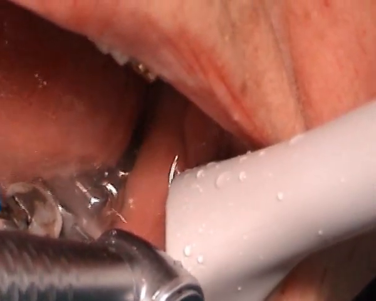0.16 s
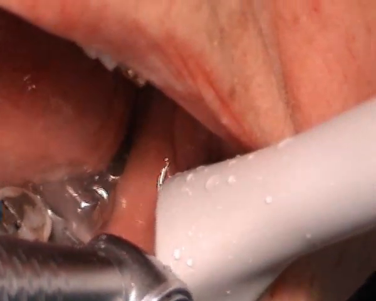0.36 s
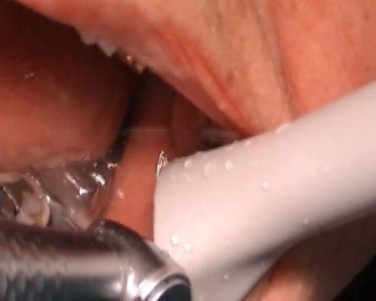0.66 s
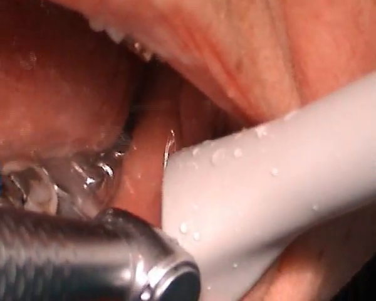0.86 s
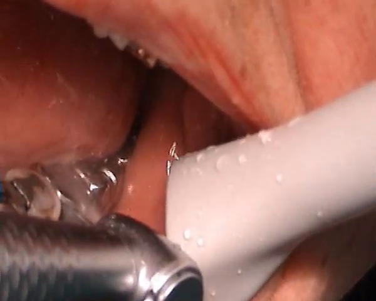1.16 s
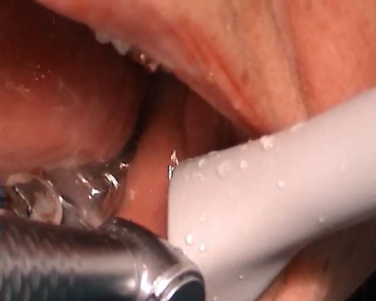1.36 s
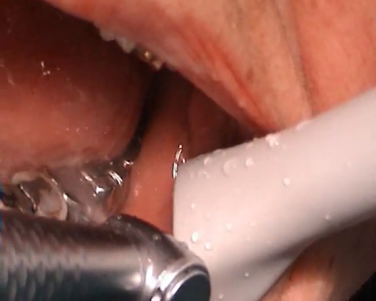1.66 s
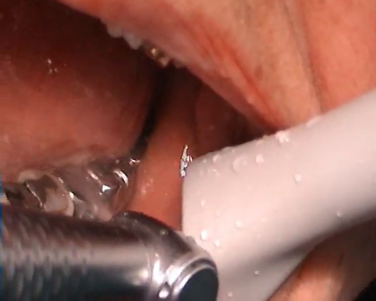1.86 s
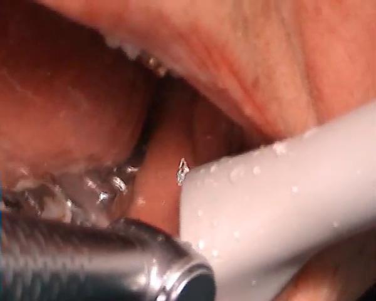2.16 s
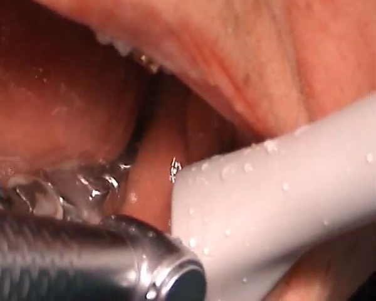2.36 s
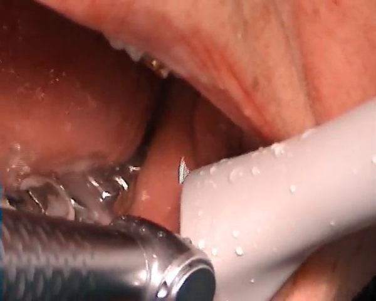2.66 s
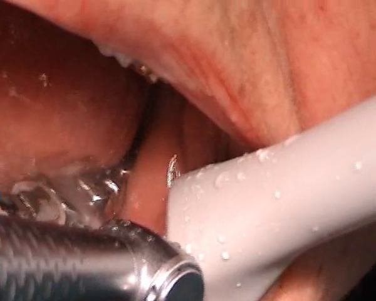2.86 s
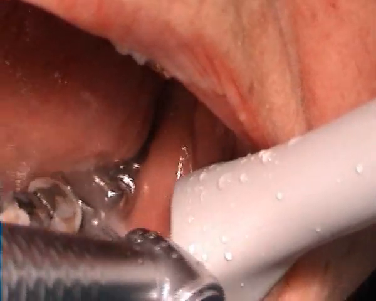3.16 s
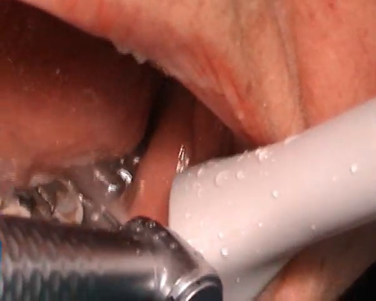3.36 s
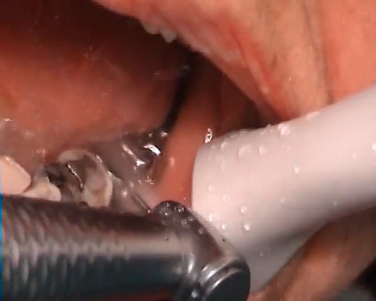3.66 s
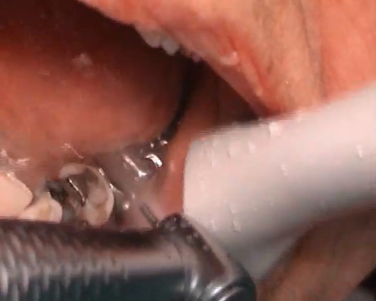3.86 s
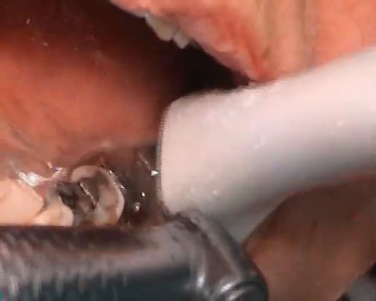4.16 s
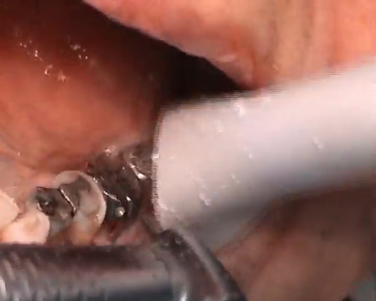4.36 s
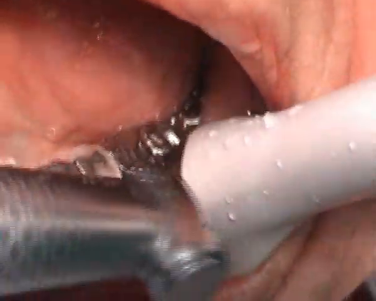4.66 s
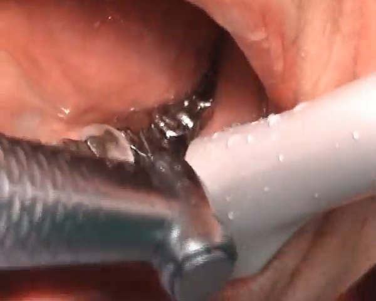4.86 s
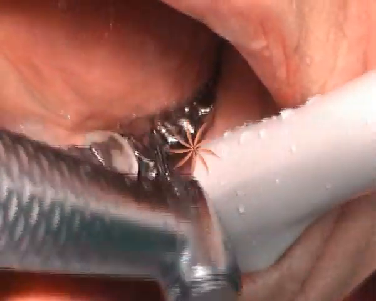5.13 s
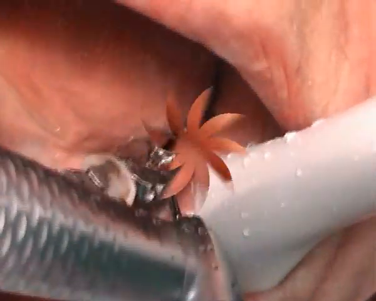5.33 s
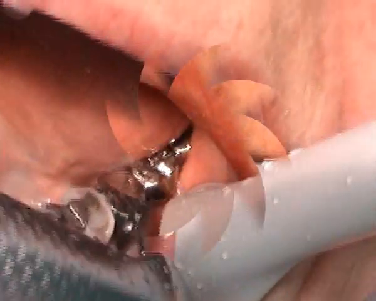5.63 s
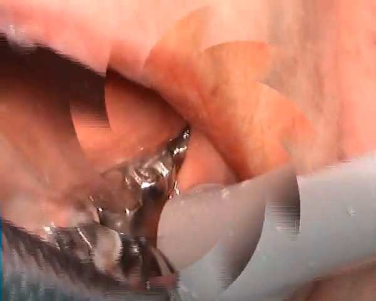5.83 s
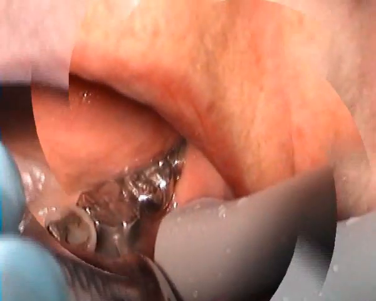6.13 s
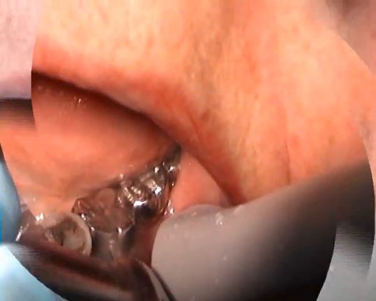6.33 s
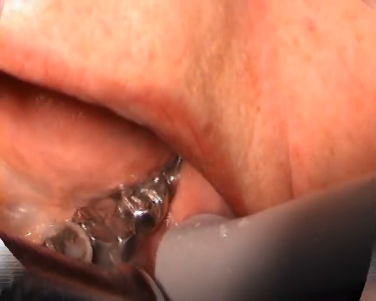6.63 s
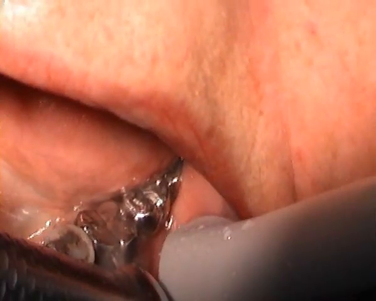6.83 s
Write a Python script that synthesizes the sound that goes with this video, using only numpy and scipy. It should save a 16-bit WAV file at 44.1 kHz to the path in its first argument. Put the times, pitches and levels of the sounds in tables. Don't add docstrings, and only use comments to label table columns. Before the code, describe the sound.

A dental drill whines shrilly through hissing water spray and suction, speeds up, rattles down to a stop, then fades into another pass.

```python
import sys
import numpy as np
from scipy import signal
from scipy.fft import rfft, irfft, next_fast_len
from scipy.io import wavfile

SR = 44100
rng = np.random.default_rng(int(sys.argv[2]) if len(sys.argv) > 2 else 0)


def magnitude_from_level(level_db):
    exponent = np.asarray(level_db, float) / 20
    return 10 ** exponent


def inscribe(sig):
    pcm = np.round(np.clip(np.atleast_2d(sig).T, -1, 1) * 32767)
    wavfile.write(sys.argv[1], SR, pcm.astype(np.int16))


N = 308259
TIME_S = np.arange(N) / SR
SIZE = next_fast_len(N, real=True)
HZ = np.maximum(np.fft.rfftfreq(SIZE, 1 / SR), 1)
LOG_HZ = np.log(HZ)

LIFT_OFF_S, AIR_SHUT_S = 3.09, 4.248
FADE_OUT_S, FADE_OUT_DB_PER_S = 5.033, 13
FADE_IN_S, FADE_IN_LENGTH_S = 5.773, 1.27

# frequency in Hz, level in dB per Hz.
ROOM_COLOUR = [(25, -22), (50, -20), (100, -22), (200, -14), (350, -11.5), (480, -11.5), (700, -14.5)]
ROOM_DB = -46.5
# centre in seconds, half length in seconds, frequency in Hz, level in dB, change at the edges in dB.
HUM = (5.55, .7, 66.6, -56.5, -16)

# centre in seconds, half length in seconds, frequency in Hz, width in Hz, level in dB.
RIM_WHISTLE = (4.5, 0.2, 3640, 45, -30)
# start in seconds, share lifted out of the water 0-1, air flow in dB.
TIP = [
    (0, 0.02, -20),
    (.18, 0.02, -24),
    (2.95, .02, -24),
    (3.2, .15, -21),
    (4.0, 0.58, -19),
    (4.2, 0.45, -22),
    (4.27, 0.92, -18.5),
    (4.45, 0.93, -18),
    (5.0, 0.82, -17),
]
UPPER_RESONANCES_DB = (0.38, -3, 2.3)
# frequency in Hz, level in dB per Hz.
TIP_WET = [(700, -11), (1100, -5.5), (1350, 2), (1540, 11), (1800, 1), (2000, -6), (2250, -9), (2600, 2),
           (2900, 8.5), (3400, 5), (3850, -8.5), (4200, 2.5), (4500, -3.5), (5200, 2.5)]
# frequency in Hz, level in dB per Hz.
TIP_OPEN = [(800, -1.5), (1150, 5), (1480, 19.5), (1750, 9.5), (2180, -4), (2700, 1.5), (3300, 10.5),
            (3800, 3), (4800, 2.5), (5800, 6.5), (7300, 6.5), (9000, 2.5), (11000, -4), (13700, -12.5)]
# frequency in Hz, level in dB per Hz.
TIP_OPEN_RUMBLE = [(25, -19), (50, -19), (100, -13.5), (200, -7.5), (350, -6), (500, -8.5), (800, -3)]
# frequency in Hz, level in dB per Hz.
TIP_SECOND = [(700, -12), (1050, -5), (1450, 8), (1750, 1), (2100, -17.5), (2600, -6), (3070, 4),
              (3400, -5), (3700, -4), (4100, -4), (4600, -3), (5200, -2)]
# centre in seconds, half length in seconds, upper resonances in dB.
CHOKES = [
    (4.3, 0.14, -4),
    (5.4, 0.096, 1.5),
]
# centre in seconds, half length in seconds, body in dB, top in dB.
TIP_HISS = [
    (4.25, 0.037, -11, -6),
    (4.5, 0.09, -4, -4),
    (4.95, .1, 1.5, -0.5),
]
RUMBLE_DB = -19.5
SECOND_DRAW_DB, SECOND_LIFTED = -22.5, 0.18
TIP_HISS_BODY_DB, TIP_HISS_TOP_DB = -20, -23.5
TIP_DULLING, TOP_LEAD_S = 1.27, 0.18

# body in dB, top in dB.
SPRAY_DB = [
    (-17, -19.5),
    (-17.5, -22),
    (-18.5, -19.5),
]
# frequency in Hz, level in dB per Hz.
SPRAY_COLOURS = [
    [(5200, -2), (6200, -1.5), (6900, 5), (7450, 8.5), (7900, 11.5), (8400, 11), (9000, 10), (9700, 5),
     (10400, 8), (10900, 12), (11400, 7.5), (12000, 1.5), (12800, 4), (13700, -6)],
    [(5200, 1.8), (6200, 4.5), (6900, 5.5), (7450, 6), (7900, 7.5), (8400, 11), (9000, 10), (9700, 6),
     (10400, 3), (10900, 5), (11400, 2), (12200, 3.5), (12800, -1.5), (13700, -5)],
    [(5200, -1.5), (5900, -5), (6900, -1.5), (7200, -0.5), (7450, 5.5), (7750, -1), (8300, 2), (9500, -6.5),
     (10200, -5), (10700, -1.5), (11300, -6), (12000, -1), (12800, -9), (13700, -5.5)],
]
# centre in seconds, half length in seconds, body in dB, top in dB.
SURGES = [
    (.05, 0.13, 2.3, -.3),
    (.3, .06, -0.5, -2),
    (1.2, .2, 0.3, 1.2),
    (2.0, .1, -0.4, -1),
    (2.7, .06, 0.7, 0.5),
    (3.75, 0.09, 1.5, 2.8),
    (4.14, .015, 1.6, 2),
    (4.22, 0.018, 0, 6),
]
# frequency in Hz, width in Hz, level over the hiss in dB.
WHISTLES = [
    (11850, 90, 5),
    (7360, 60, 5.5),
    (12100, 200, 4),
]
SPRAY_SPLIT_HZ = 9900
AIR_FALL_DB_PER_S, SPRAY_BUILDS = 350, 1.13

# time in seconds, bur rate in Hz.
FIRST_PASS = [(0.0, 3023), (0.11, 2982), (0.22, 2919), (0.44, 2861), (0.77, 2829), (1.1, 2812),
              (1.21, 2841), (1.43, 2811), (1.65, 2796), (1.87, 2744), (2.2, 2734), (2.53, 2805),
              (2.64, 2795), (2.86, 2738), (2.98, 2744)]
# time in seconds, bur rate in Hz.
RUN_UP = [
    (3.03, 2797),
    (3.08, 2906),
    (3.13, 3030),
    (3.2, 3120),
    (3.3, 3163),
    (3.45, 3183),
    (3.65, 3194),
    (3.91, 3196),
]
# time in seconds, bur rate in Hz.
SECOND_PASS = [
    (5.8, 3147),
    (6.3, 3151),
    (6.62, 3152),
    (6.68, 3132),
    (6.74, 3081),
    (6.8, 3019),
    (6.86, 2988),
    (6.99, 2944),
]
# free bur rate in Hz, drop at full load in Hz.
LOADING = [
    (3190, 250),
    (3150, 30),
]
# 2nd, 3rd, gear mesh, 4th order, motor, each as free level in dB, cutting level in dB.
ORDER_DB = [
    [(-41, -36), (-24, -26), (-60, -24), (-43, -26), (-44, -55)],
    [(-52, -26), (-45, -28), (-60, -50), (-53, -27), (-47, -53)],
]
MESH_ORDER, MOTOR_ORDER = 3.177, 0.2
# centre in seconds, half length in seconds, column of ORDER_DB, change in dB.
BITES = [(.15, .09, 0, 8), (.7, .22, 0, -11), (1.3, .2, 0, 5), (1.66, .08, 0, 7), (2.45, .13, 0, 4),
         (2.82, .04, 0, -3), (2.98, .05, 0, 4.5), (3.18, .06, 0, -16), (.11, .05, 1, -8), (.38, .16, 1, 8),
         (1.37, .1, 1, 8), (1.63, .07, 1, -6), (2.2, .06, 1, 6), (2.53, .15, 1, 8), (2.92, .07, 1, -6),
         (6.72, .04, 3, -4), (6.8, .05, 1, 5), (.08, .08, 3, -5), (.8, .22, 3, -11), (1.93, .1, 3, 4),
         (2.2, .05, 3, 6), (2.95, .1, 3, -4), (3.17, .05, 3, -16), (3.45, .07, 3, 6), (.08, .1, 4, 5),
         (.77, .04, 4, 6), (1.0, .06, 4, 7), (1.65, .05, 4, 6)]
# time in seconds, bur rate in Hz, rattle in dB.
COAST = [
    (3.91, 3195, -33),
    (4.09, 2600, -37),
    (4.13, 2425, -30),
    (4.19, 2090, -25),
    (4.22, 1914, -23),
    (4.25, 1780, -24),
    (4.3, 1598, -36),
    (4.5, 1080, -33),
    (4.84, 400, -37),
]
# order, level with air on in dB, level after the air shuts in dB.
COAST_ORDERS = [(1, 2, 6), (3, 7, -3), (4, 2, -3), (5, 0, 2), (6, 5, -10), (7, -1, -12), (8, -6, 4),
                (16, -9, 6)]
# frequency in Hz, level in dB.
HEAD_RING = [(900, -30), (1300, -9), (1900, -4), (2200, -11), (3100, 3), (5400, -13), (6200, -20),
             (7300, -4), (8500, 1), (10000, -1), (12000, 3), (13000, 1), (13900, -9)]

# frequency in Hz, left lead in radians, left-right in dB, likeness 0-1.
PORTS = [(600, 0.18, 7, 0.92), (2500, 0.74, -3, 0.96), (4070, .1, -3, 1), (5660, 1.1, 4, 1),
         (6150, 0.35, 2, 0.62), (7730, 0.62, 3.5, 0.76), (8250, 1.9, 2, 1), (9120, 2.06, 1.3, 1),
         (9570, 2.7, 2.5, 0.84), (10500, 2.5, 6.5, 0.55), (10860, 2.34, 6.5, 1), (11800, 0.94, 4, 0.55),
         (13800, 1.2, 1.5, .22)]
# frequency in Hz, left lead in radians, left-right in dB, likeness 0-1.
PORTS_TIP = [(60, 0.099, 2.2, 0.89), (300, 0.039, 0, 1), (700, .1, -2, .94), (1370, 0, 0.5, 1),
             (2100, 0.048, -0.5, 1), (3280, 0.29, 0, 0.95), (4800, 0.43, 3.5, 0.9), (7800, 0.34, 2.5, 0.78),
             (9100, 0.75, 3.5, 0.63), (9900, 1, 3.5, 0.16), (11900, .1, 4.5, 0.74), (13700, .1, -2, 0.62)]


def in_time(rows, off=None):
    s, *columns = np.transpose(rows)
    return [np.interp(TIME_S, s, c, left=off, right=off) for c in columns]


def swells(rows):
    s, half_s, *columns = np.transpose(rows)
    coarse_s = TIME_S[::128]
    bells = np.exp(-0.5 * ((coarse_s[:, None] - s) / half_s) ** 2)
    return [np.interp(TIME_S, coarse_s, bells @ c) for c in columns]


def drift(rate_hz):
    knots = rng.standard_normal(282)
    return np.interp(TIME_S * rate_hz, np.arange(len(knots)), knots)


def fading_db(lead_s=0.0):
    return -FADE_OUT_DB_PER_S * np.maximum(TIME_S + lead_s - FADE_OUT_S, 0)


def rising_db():
    return 20 * np.log10(np.clip((TIME_S - FADE_IN_S) / FADE_IN_LENGTH_S, 1e-5, 1))


def at_hz(points, column=1):
    points = np.array(points)
    return np.interp(LOG_HZ, np.log(points[:, 0]), points[:, column])


def above(hz):
    return 1 / (1 + np.minimum(hz / HZ, 9) ** 24)


def closed(points):
    octaves_below = np.maximum(np.log2(points[0][0] / HZ), 0)
    octaves_above = np.maximum(np.log2(HZ / points[-1][0]), 0)
    return magnitude_from_level(at_hz(points) - 17.4 * (octaves_below + octaves_above))


def whistling(colour, hz, width_hz, lift_db):
    return closed(colour) * magnitude_from_level(lift_db / (1 + ((HZ - hz) / width_hz) ** 2))


def at_ports(spectrum, other, ports):
    alike = np.clip(at_hz(ports, column=3), 0, 0.987)
    right = alike * spectrum * np.exp(-1j * at_hz(ports)) + np.sqrt(1 - alike ** 2) * other
    tilt = magnitude_from_level(at_hz(ports, column=2) / 2)
    return irfft(np.array([spectrum * tilt, right / tilt]), SIZE)[:, :N]


def turbulence(gain, ports, low_hz, high_hz):
    real, imaginary = rng.standard_normal((2, 2, len(HZ)), dtype=np.float32)
    one, other = gain * (real + 1j * imaginary)
    inside = (HZ > low_hz) & (HZ < high_hz)
    return at_ports(one, other, ports) * SIZE / (2 * np.sqrt(np.sum(gain[inside] ** 2)))


def hiss(levels_db, colour, ports):
    body_db, top_db = levels_db
    shared_db = 0.5 * drift(9) + 0.86 * drift(30)
    top = above(SPRAY_SPLIT_HZ)
    body = turbulence(colour * np.sqrt(1 - top) * np.sqrt(above(4660)), ports, 6500, 9670)
    sizzle = turbulence(colour * np.sqrt(top), ports, 8400, 17000)
    body_gain = magnitude_from_level(body_db + shared_db + 0.33 * drift(16))
    top_gain = magnitude_from_level(top_db + shared_db + 0.72 * drift(25))
    return body_gain * body + top_gain * sizzle


def whine(turns_hz, orders, wobble):
    out, on = np.zeros(N), turns_hz > 0
    trembling_hz = turns_hz * (1 + wobble * drift(38))
    phase = 2 * np.pi * np.cumsum(trembling_hz[on]) / SR
    for order, level_db in orders:
        audible = order * turns_hz[on] < 13900
        out[on] += np.sqrt(2) * magnitude_from_level(level_db[on]) * np.sin(order * phase) * audible
    return out


def clinic():
    diffuse = [(20, 0.0, 1.7, 0.99), (900, 0.0, 0.3, 0.5)]
    fade = np.hypot(magnitude_from_level(fading_db()), magnitude_from_level(rising_db()))
    rumble = magnitude_from_level(ROOM_DB) * fade * turbulence(closed(ROOM_COLOUR), diffuse, 20, 870)
    s, half_s, hum_hz, hum_db, edge_db = HUM
    level_db = hum_db + edge_db * ((TIME_S - s) / half_s) ** 4
    return rumble + whine(np.full(N, hum_hz), [(1, level_db)], wobble=0.004)


def rim_whistle():
    s, half_s, hz, width_hz, level_db = RIM_WHISTLE
    band = turbulence(1 / (1 + ((HZ - hz) / width_hz) ** 2), PORTS_TIP, 3000, 4300)
    return magnitude_from_level(level_db - 6 * ((TIME_S - s) / half_s) ** 4) * band


def suction():
    lifted, flow_db = in_time(TIP)
    choke_db = swells(CHOKES)[0]
    early = magnitude_from_level(flow_db + fading_db()) ** 2
    late = magnitude_from_level(SECOND_DRAW_DB + rising_db()) ** 2
    late_open = late * SECOND_LIFTED
    powers = early * (1 - lifted), early * lifted + late_open, late - late_open
    rumble = turbulence(closed(TIP_OPEN_RUMBLE), PORTS_TIP, 25, 900)
    out = magnitude_from_level(RUMBLE_DB) * np.sqrt(powers[1]) * rumble
    upper = above(2160)
    for power, upper_db, colour in zip(powers, UPPER_RESONANCES_DB, (TIP_WET, TIP_OPEN, TIP_SECOND)):
        low = turbulence(closed(colour) * np.sqrt(1 - upper), PORTS_TIP, 1080, 1830)
        high = turbulence(closed(colour) * np.sqrt(upper * (1 - above(4670))), PORTS_TIP, 2450, 3620)
        low_gain = magnitude_from_level(0.22 * drift(5.3))
        high_gain = magnitude_from_level(upper_db + choke_db + 0.68 * drift(13))
        out = out + np.sqrt(power) * (low_gain * low + high_gain * high)
    fade_db = TIP_DULLING * np.array([fading_db(), fading_db(TOP_LEAD_S)])
    hiss_db = swells(TIP_HISS) + np.c_[[TIP_HISS_BODY_DB, TIP_HISS_TOP_DB]] + fade_db
    hiss_db = hiss_db - 99 * (TIME_S < AIR_SHUT_S)
    return out + hiss(hiss_db, whistling(TIP_OPEN, *WHISTLES[2]), PORTS_TIP)


def spray():
    free = np.clip((TIME_S - LIFT_OFF_S) / 0.06, 0, 1)
    cutting, running, second = SPRAY_COLOURS
    cutting_db, running_db, second_db = [np.c_[list(row)] for row in SPRAY_DB]
    pressure_db = np.array(swells(SURGES)) - AIR_FALL_DB_PER_S * np.maximum(TIME_S - AIR_SHUT_S, 0)
    out = np.sqrt(1 - free) * hiss(pressure_db + cutting_db, closed(cutting), PORTS)
    out = out + np.sqrt(free) * hiss(pressure_db + running_db, whistling(running, *WHISTLES[0]), PORTS)
    late_db = SPRAY_BUILDS * rising_db() + second_db
    return out + hiss(late_db, whistling(second, *WHISTLES[1]), PORTS_TIP)


def bur_whine():
    tone = 0
    bites_db = []
    for column in range(5):
        rows = [(s, half_s, db) for s, half_s, which, db in BITES if which == column]
        bites_db.append(swells(rows or [(0, 1, 0)])[0])
    passes = zip((FIRST_PASS + RUN_UP, SECOND_PASS), LOADING, ORDER_DB, (0, rising_db()))
    for rows, (free_hz, drop_hz), orders, fade_db in passes:
        turns_hz, = in_time(rows, off=0)
        load = np.clip((free_hz - turns_hz) / drop_hz, 0, 1)
        levels_db = [free_db + load * (cut_db - free_db) + bite_db + fade_db
                     for (free_db, cut_db), bite_db in zip(orders, bites_db)]
        flutter_db = [level_db + 0.6 + 2.1 * drift(30) for level_db in levels_db]
        flutter_db.append(levels_db[-1] + 8.5)
        multiples = (2, 3, MESH_ORDER, 4, MOTOR_ORDER, 1)
        tone = tone + whine(turns_hz, zip(multiples, flutter_db), wobble=0.0004)
    return tone


def coast_rattle():
    tone = 0
    turns_hz, rattle_db = in_time(COAST, off=-99)
    ring_hz, ring_db = np.transpose(HEAD_RING)
    for order, on_db, shut_db in COAST_ORDERS:
        pitch_hz = order * turns_hz
        dull_db = shut_db - 5 * np.maximum(pitch_hz / 1000 - 9.5, 0)
        level_db = rattle_db + np.where(TIME_S < AIR_SHUT_S, on_db, dull_db)
        level_db = level_db + np.interp(pitch_hz, ring_hz, ring_db)
        tone = tone + whine(turns_hz, [(order, level_db)], wobble=0.00084)
    return tone


def handpiece():
    tone = bur_whine() + coast_rattle()
    return at_ports(rfft(tone, SIZE), rfft(np.roll(tone, 57), SIZE), PORTS)


def scene():
    return handpiece() + spray() + suction() + clinic() + rim_whistle()


def band_limit(x):
    return signal.sosfilt(signal.butter(12, 13820, fs=SR, output="sos"), x)


def record(dry):
    mix = np.clip(dry, -1, 1)
    return band_limit(mix)


dry = scene()
out = record(dry)
inscribe(out)
```